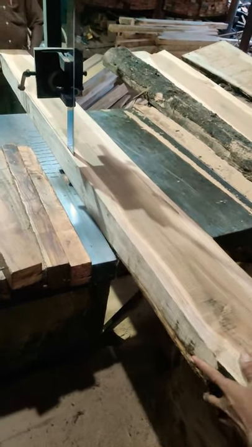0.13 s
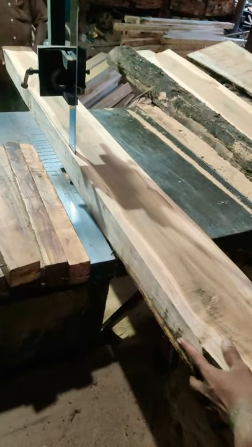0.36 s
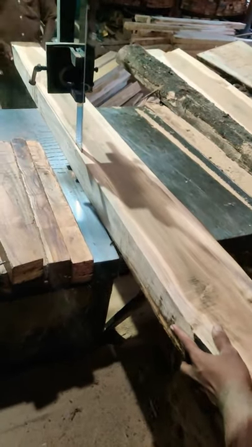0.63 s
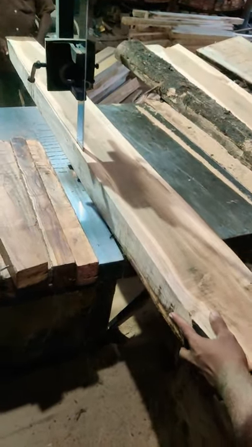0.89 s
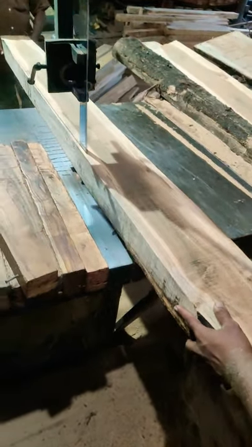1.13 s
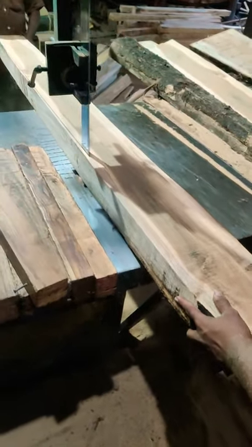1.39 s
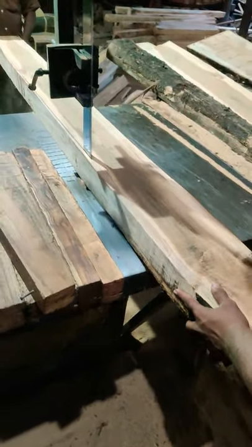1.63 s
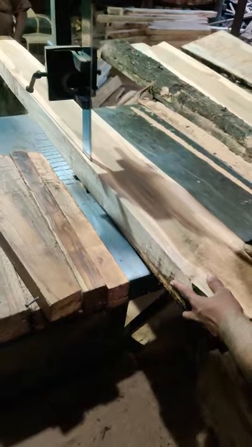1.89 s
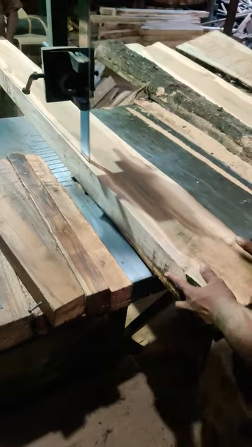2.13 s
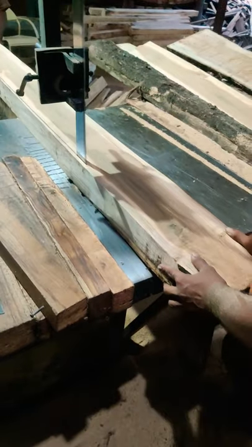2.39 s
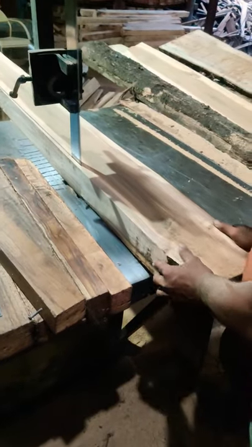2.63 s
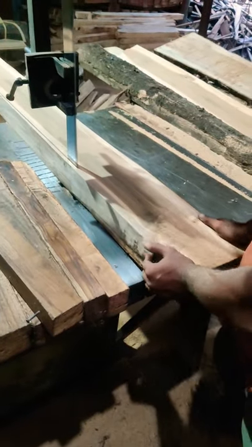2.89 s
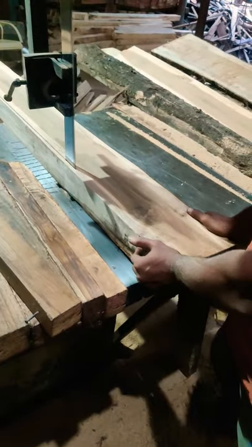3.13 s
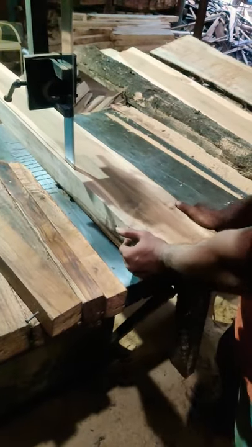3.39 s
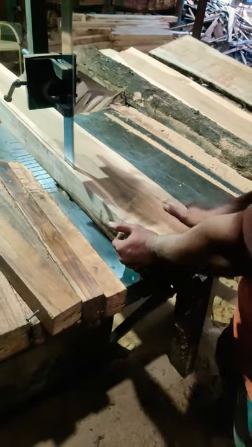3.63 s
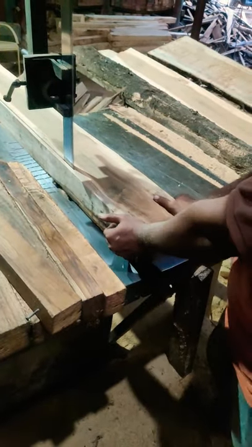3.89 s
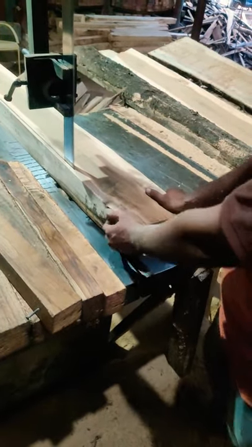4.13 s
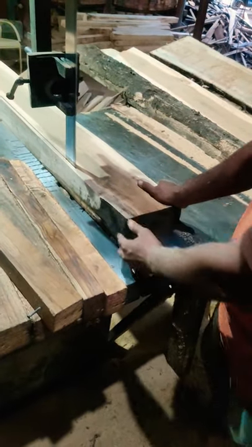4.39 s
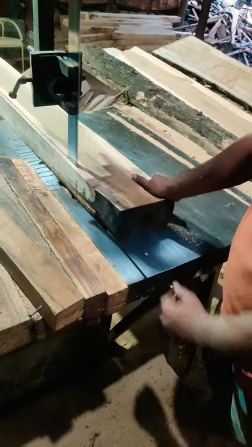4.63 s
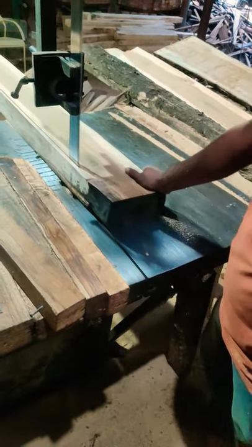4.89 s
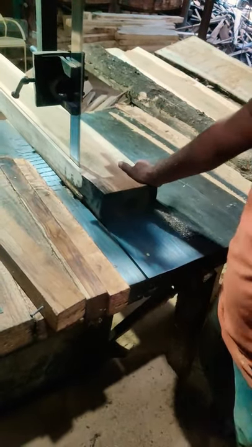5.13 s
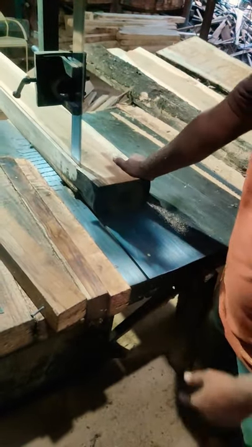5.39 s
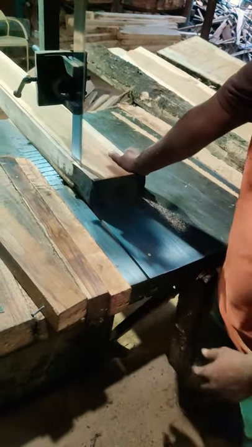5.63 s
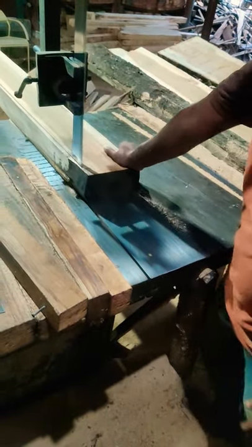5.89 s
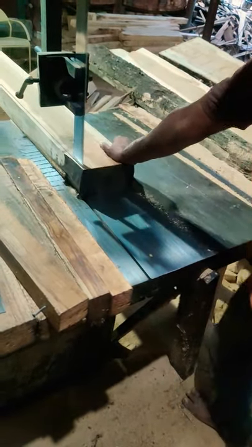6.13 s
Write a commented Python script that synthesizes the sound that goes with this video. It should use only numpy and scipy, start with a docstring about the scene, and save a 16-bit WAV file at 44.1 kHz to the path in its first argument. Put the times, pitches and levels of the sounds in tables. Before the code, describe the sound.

A band saw cuts lengthwise through a thick plank without pause. A dense woody roar, noisy blade ringing and bright chip hiss dominate over soft frame rumble and wavering hum. Slight rough flutter follows the grain. The hiss loses some brightness past four seconds, and low notes swell near the end. Heard from about two metres on a handheld stereo phone in an open timber shed.

```python
"""A band saw rips a thick plank in an open shed, two metres from a hand-held phone with two microphone ports.
From the start a low hum wavers, the frame rumbles, the plank roars, the blade rings, the chips hiss
and the teeth sound their tones. The broad sounds are coloured noise: part comes straight, left port first,
the rest scattered from roof and timber stacks; hum and tooth tones are sines. Hard and soft patches pass.
At 4.4 s the bright band of the hiss weakens; near 5.8 s the last uncut piece shakes freely and the low notes swell."""
import sys
import numpy as np
from scipy import signal
from scipy.fft import rfft, irfft
from scipy.io import wavfile
from scipy.ndimage import uniform_filter1d

SR = 44100
rng = np.random.default_rng(int(sys.argv[2]) if len(sys.argv) > 2 else 0)


def transcribe(signal):
    """Save signal, clipped to [-1, 1], as a 16-bit WAV file at the path in sys.argv[1]."""
    frames = np.atleast_2d(signal).T
    limited = np.clip(frames, -1, 1)
    pcm = np.round(limited * 32767).astype(np.int16)
    wavfile.write(sys.argv[1], SR, pcm)


def ratio_of_db(decibels):
    """Turn decibels (scalar or array-like) into linear amplitude factors; 0 dB maps to 1."""
    return 10 ** (np.asarray(decibels, float) / 20)


N = 276066
HZ = np.arange(N // 2 + 1) * SR / N
TIME = np.arange(N) / SR


def walk(rate_hz):
    """Random levels held for 1 / rate_hz seconds and slewed twice; spread near 1."""
    hold = int(SR / rate_hz)
    held = np.repeat(rng.standard_normal(N // hold + 1), hold)
    slewed = uniform_filter1d(uniform_filter1d(held, hold), hold)
    return 1.21 * slewed[:N]


def glide(middle_s, rise_s):
    """A smooth change from 0 to 1 around middle_s."""
    return (1 + np.tanh((TIME - middle_s) / rise_s)) / 2


def bumps(centre_hz, width_hz, peak_db):
    """Sum in dB of bell-shaped resonances over frequency."""
    return sum(db / (1 + (2 * (HZ - hz) / width) ** 2)
               for hz, width, db in zip(centre_hz, width_hz, peak_db))


def layer(colour, force, lag_s):
    """Noise under a force envelope, part straight and part scattered, coloured for each port; joint rms 1."""
    # resonances of frame, plank and blade, shaken by the cut: centre_hz
    mode_hz = [97, 163, 208, 289, 1004, 1318, 1357, 1398, 1440, 1478, 1543, 1598, 1682, 1760, 3572, 3830,
               4605]
    # shape of each resonance, in the same order: width_hz, left_db, right_db
    mode_shapes = [(26, -1, 0.9), (21, 6.5, 5.5), (14, 7.5, 6.4), (32, 6, 4.2), (7.6, 2, 14), (23.1, 6, 5),
                   (20, -3, 5.5), (20, 1.5, 3), (20, -8, 5.3), (25, -5, 2.5), (21, 3, 9.5), (25, -12, 3.5),
                   (20, 7, 4), (25, 1.5, 3.5), (163, 7, 6), (150, 0, 0.2), (322, 8, 1)]
    width_hz, mode_left_db, mode_right_db = np.transpose(mode_shapes)
    hz, left_db, right_db, share = np.transpose(colour)

    def spread(column):
        """Draws a table column out over all frequencies, on a log scale."""
        return np.interp(np.log(HZ + 1), np.log(hz), column)

    inside = (HZ > hz[0] / 2) & (HZ < hz[-1] * 1.01)
    straight, scattered = (rfft(force * rng.standard_normal(N)) for _ in range(2))
    share = np.clip(spread(share), 0, 1)
    # the right port hears a share of the left sound late, the rest by other paths
    late = straight * np.exp(-2j * np.pi * HZ * lag_s)
    right = share * late + np.sqrt(1 - share ** 2) * scattered
    left_gain = ratio_of_db(spread(left_db) + bumps(mode_hz, width_hz, mode_left_db))
    right_gain = ratio_of_db(spread(right_db) + bumps(mode_hz, width_hz, mode_right_db))
    pair = irfft(inside * np.array([straight * left_gain, right * right_gain]), N)
    return pair / np.sqrt(np.mean(pair ** 2))


def motor_hum():
    """Hum of the drive: one steady low tone that wavers in strength."""
    # pitch_hz, left_db, right_db
    hum = (53.3, -57, -53)
    pitch_hz, *ports_db = hum
    level = ratio_of_db(np.array(ports_db)[:, None] + 2.5 * walk(4.96))
    return np.sqrt(2) * level * np.sin(2 * np.pi * pitch_hz * TIME)


def frame_rumble(loose):
    """Low noise of the frame; it fades as the uncut plank shortens and swells when the end is loose."""
    # colour at the two ports: pitch_hz, left_db, right_db (relative, per Hz), straight_share (0-1)
    colour = [(25, -13, -20, .9), (67, -14, -14, .95), (78, -3.5, -4, 0.95), (89, -3, -2, 0.99),
              (110, -1.5, -0.5, 1), (127, -6.5, -4.5, 1), (235, -8, -5.5, 0.93), (315, -6, -2, 0.99),
              (435, -3.5, -1.5, 0.73), (468, -23, -10, 0.04), (600, -28, -32, 0.8)]
    level_db = -19.5 - 0.34 * TIME + 2.5 * loose
    return layer(colour, ratio_of_db(0.99 * walk(14)), lag_s=0.00016) * ratio_of_db(level_db)


def plank_body(loose):
    """Noise of the plank's body; it fades as the uncut plank shortens and swells when the end is loose."""
    # colour at the two ports: pitch_hz, left_db, right_db (relative, per Hz), straight_share (0-1)
    colour = [(330, -30, -18.5, 0.46), (483, -9.5, -1.5, 0.6), (640, -2, -1, 0.39), (910, 0, -1, 0.81),
              (1130, 0.5, 1, 0.35), (1154, 3.5, 3.5, 0.19), (1430, -17, -25, .3)]
    level_db = -15.5 - 0.43 * TIME + 2.5 * loose
    return layer(colour, ratio_of_db(1.1 * walk(8.9)), lag_s=0.00015) * ratio_of_db(level_db)


def plank_roar(grain, loose):
    """Mid-range roar of the plank, driven by the grain and its own unevenness; a little louder when loose."""
    # colour at the two ports: pitch_hz, left_db, right_db (relative, per Hz), straight_share (0-1)
    colour = [(1140, -21, -22.5, 0.89), (1244, -7, -17.5, 0.33), (1330, -2.5, 0, 0.51),
              (1496, 2, -0.5, 0.43), (1504, -7, -3.5, 0.25), (1950, -5, -7, 0.33), (2005, -10.5, -5, 0.98),
              (2425, -13.5, -9.5, 0.094), (2720, -47, -54, .2)]
    force = ratio_of_db(0.37 * grain + 0.45 * walk(15))
    return layer(colour, force, lag_s=0.00034) * ratio_of_db(-7 + 0.8 * loose)


def blade_ring(grain):
    """High ringing noise of the blade, which dulls as the cut goes on."""
    # colour at the two ports: pitch_hz, left_db, right_db (relative, per Hz), straight_share (0-1)
    colour = [(2100, -20.5, -20, .2), (2650, -3.5, -4.5, 0.19), (3500, -3, -3, 0.028),
              (3770, 1, -0.5, 0.11), (4050, -5.5, -3, 0.24), (4790, 0.5, -1, 0.34), (5900, -10, -14, 0.066),
              (6800, -11, -11, 0.15), (7030, -22, -25, 0.32)]
    force = ratio_of_db(0.22 * grain + 0.6 * walk(18))
    return layer(colour, force, lag_s=0.00055) * ratio_of_db(-3 - 0.13 * TIME)


def chip_hiss(chips):
    """Treble noise of torn chips: coarse ones hiss lower, fine ones higher, and the two flicker apart."""
    # colours at the two ports: pitch_hz, left_db, right_db (relative, per Hz), straight_share (0-1)
    coarse_colour = [(6620, -39, -26, .4), (6795, -2, 0, 0.45), (7560, 2, 3, 0.22), (9200, -3, -3.5, 0.13),
                     (10250, -10, -3.5, .15), (10800, -22, -20, .2)]
    fine_colour = [(9750, -20, -16, 0.22), (10530, -7, -2.5, .15), (10850, 0.5, 2.5, 0.18),
                   (11930, -1, -3, 0.16), (12000, 2, 3.5, 0.86), (13100, -5.5, -4, .1),
                   (15000, -1.5, -1, .15), (15670, -1, 1.5, .15)]
    coarse_force = chips * ratio_of_db(0.95 * walk(32))
    fine_force = chips * ratio_of_db(0.75 * walk(30))
    coarse = layer(coarse_colour, coarse_force, lag_s=0.000617) * ratio_of_db(-9.5)
    fine = layer(fine_colour, fine_force, lag_s=0.000586) * ratio_of_db(-7)
    return coarse + fine


def chip_sheen(chips):
    """A bright band of the hiss, strongest at the right port; weakens as the worker steps up to the blade."""
    # colour at the two ports: pitch_hz, left_db, right_db (relative, per Hz), straight_share (0-1)
    colour = [(10300, -20, -20, .2), (10750, -9, 0, .3), (11200, -9, -1, .3), (11600, -20, -20, .2)]
    level_db = -16 - 9.5 * glide(4.4, rise_s=0.15)
    return layer(colour, chips, lag_s=0.00059) * ratio_of_db(level_db)


def tooth_tones(turn):
    """Tones of the tooth pattern; each swells, fades and slips in phase at random, on its own."""
    # multiple of the pattern rate, left_db, right_db, right_lag_rad
    tones = [(1, -50.5, -50.5, .1), (4, -51, -48, 0.22), (12, -46, -43, 0.72), (16, -39, -40, 1.63),
             (20, -41, -42, 1.56), (52, -60, -60, 1.8)]
    out = np.zeros((2, N))
    for multiple, left_db, right_db, lag_rad in tones:
        swell = ratio_of_db(3.5 * walk(7))
        slip_rad = 1.3 * walk(14)
        ports = ratio_of_db(np.array([[left_db], [right_db]]))
        lags_rad = np.array([[0], [lag_rad]])
        out += np.sqrt(2) * swell * ports * np.sin(round(multiple) * turn + slip_rad - lags_rad)
    return out


def wood_patches():
    """Level in dB as the teeth meet hard patches (louder) and soft patches (quieter) of wood."""
    # middle_s, length_s, level_db
    patches = [(0.084, 0.065, 1.2), (0.324, .08, .8), (.68, 0.19, 1.2), (1.5, 0.058, .9), (1.87, .1, .9),
               (1.98, .08, -1.7), (2.64, .08, 0.5), (3.45, 0.27, 0.8), (3.68, .15, -1.5), (4.056, .08, 1.2),
               (4.284, .06, 1.5), (4.4, .08, -0.2), (5.66, 0.085, -2), (6.03, .14, -1.3)]
    return sum(db * np.exp(-(2 * (TIME - middle_s) / length_s) ** 2) for middle_s, length_s, db in patches)


def push_and_sway():
    """Gain at each port from the worker's push on the plank and the sway of the hand-held phone."""
    # time_s, bite_db, left_minus_right_db
    push = [(0, -16.5, 1.7), (.7, -15, 1), (1.05, -15.4, -1), (1.5, -15.2, 0.2), (2.3, -16, -0.7),
            (2.9, -16, 0), (3.4, -15.5, -0.5), (3.9, -16.5, 0), (5, -16, 1.1), (5.35, -16, -.1),
            (6.26, -16.5, 0.5)]
    time_s, *columns = np.transpose(push)
    bite_db, pan_db = (np.interp(TIME, time_s, column) for column in columns)
    return ratio_of_db(bite_db) * ratio_of_db(np.array([pan_db, -pan_db]) / 2)


def scene():
    """The layers of the cut under one shared unevenness, plus tooth tones and hum."""
    pattern_hz = 96.47  # mean rate of the teeth's bend pattern, which repeats every four teeth
    turn = 2 * np.pi * np.cumsum(pattern_hz * (1 + 0.00211 * walk(8))) / SR
    grain = walk(14)  # knots and fibres: one unevenness shared by roar, ring and chips
    puffs = 1 + 0.046 * np.cos(turn)  # chips come in puffs, one for each group of teeth
    chips = puffs * ratio_of_db(0.4 * grain)
    loose = glide(5.76, rise_s=0.073)  # the last uncut piece starts to shake freely
    patch_db = wood_patches()

    # the heavy frame and plank follow the push but not the short patches
    heavy = frame_rumble(loose) + plank_body(loose)
    # the roar feels only a share of each patch
    roar = ratio_of_db(0.71 * patch_db) * plank_roar(grain, loose)
    bright = ratio_of_db(patch_db) * (blade_ring(grain) + chip_hiss(chips) + chip_sheen(chips))
    cut = push_and_sway() * (heavy + roar + bright)
    return cut + tooth_tones(turn) + motor_hum()


def roll_off(x):
    """The treble ends steeply here."""
    return signal.sosfilt(signal.butter(12, 16860, fs=SR, output="sos"), x)


def record(dry):
    """The microphone ports dip near 6 kHz and the recorder cuts the top sharply."""
    # hollow of the phone's ports: pitch_hz, gain_db
    hollow = [(5500, 0), (5700, -3), (5870, -8), (6000, -4.5), (6150, -5), (6350, -7.5), (6450, -4.5),
              (6550, -3), (6750, 0)]
    top_hz = 15500
    ports = ratio_of_db(np.interp(HZ, *np.transpose(hollow))) * (HZ < top_hz)
    mix = irfft(rfft(dry) * ports, N)
    return roll_off(mix)


dry = scene()
out = record(dry)
transcribe(out)
```